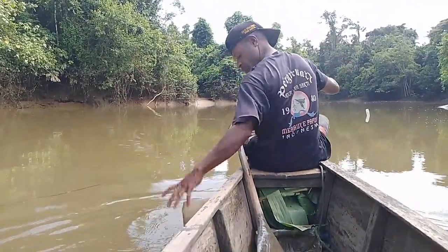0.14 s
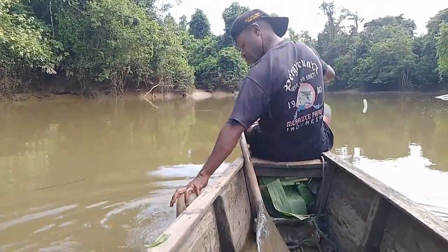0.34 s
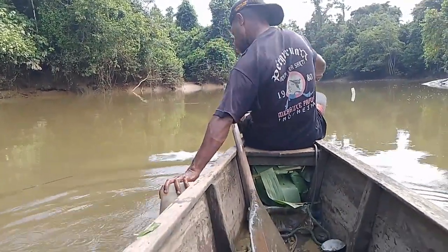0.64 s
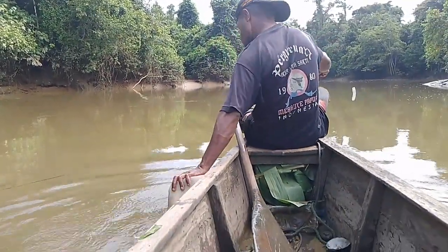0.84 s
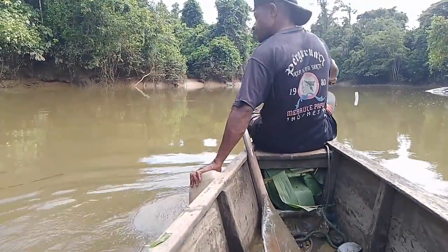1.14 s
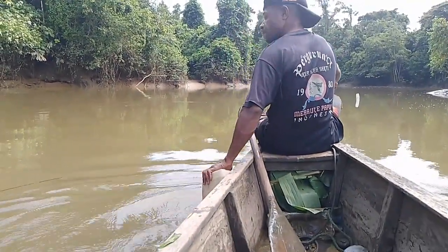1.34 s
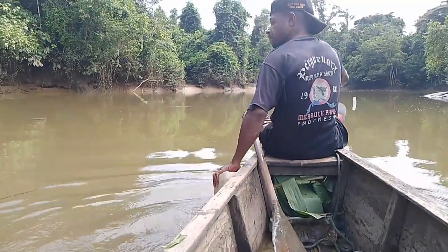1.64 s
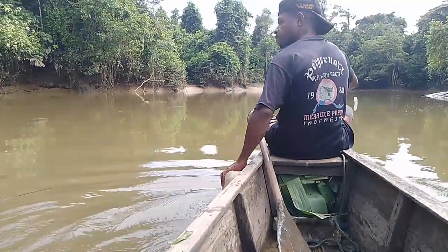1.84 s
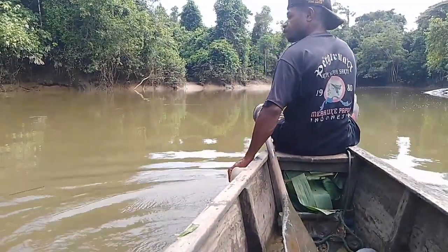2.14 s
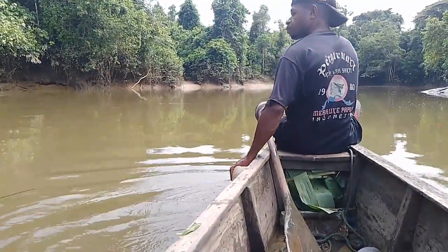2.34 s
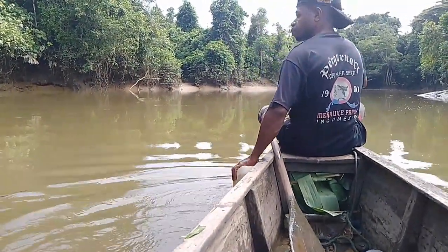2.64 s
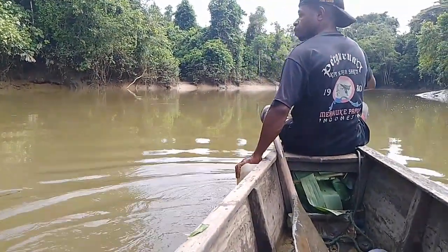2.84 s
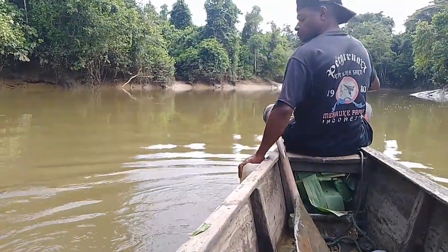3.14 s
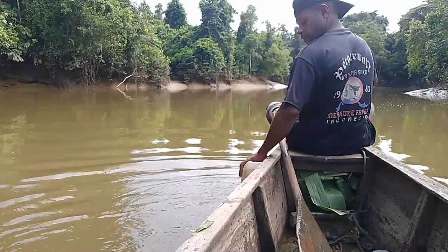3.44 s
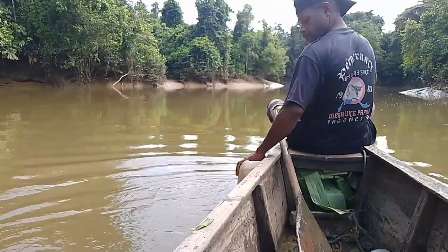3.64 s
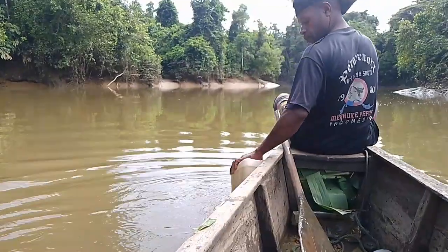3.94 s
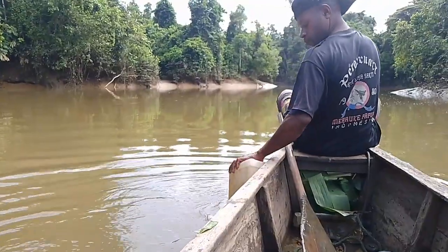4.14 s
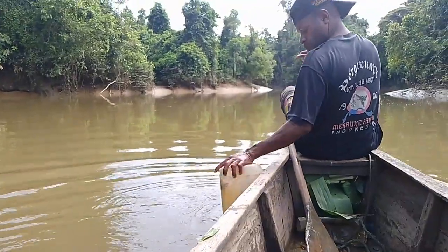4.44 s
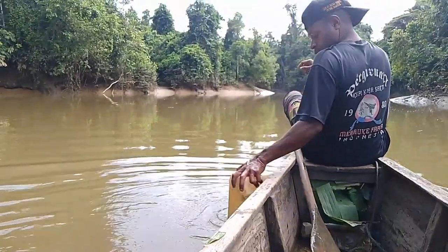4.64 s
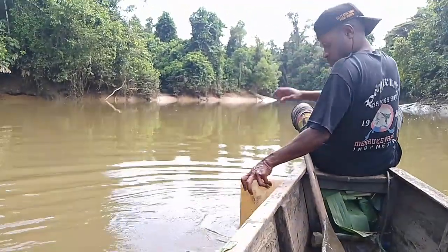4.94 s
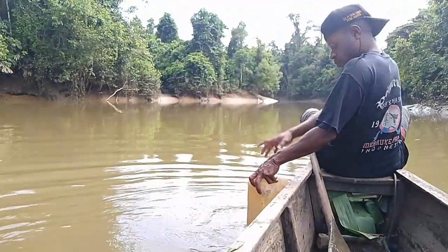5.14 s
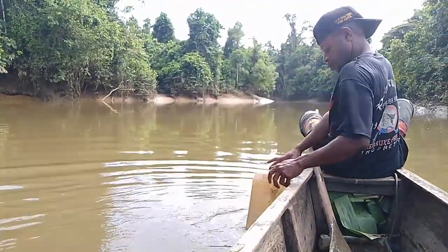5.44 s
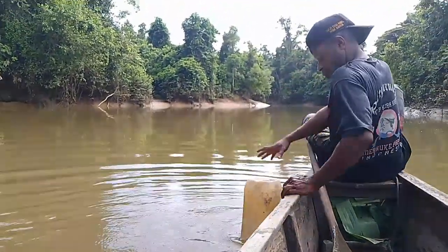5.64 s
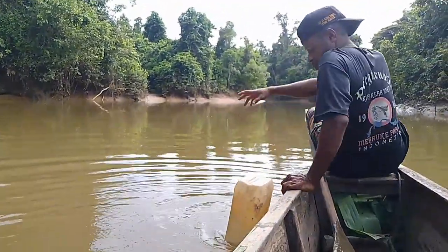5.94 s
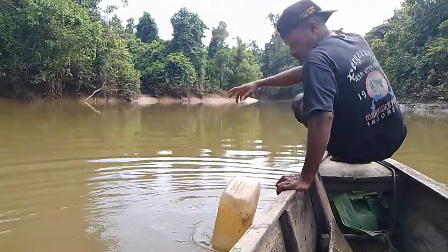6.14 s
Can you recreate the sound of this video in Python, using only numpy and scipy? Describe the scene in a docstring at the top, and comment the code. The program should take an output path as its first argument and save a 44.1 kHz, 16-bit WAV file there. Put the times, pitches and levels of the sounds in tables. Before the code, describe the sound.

Very close to the microphone, a plastic can bumps a wooden canoe in a rapid cluster of low, hollow thuds with grinding, small splashes, gurgles and drips. The water settles and a quiet stretch follows, with only faint hollow notes. Then the can is lifted, rubbing in gritty strokes, knocking the hull and humming hollowly. Faint cicadas pulse over a dull river wash outdoors.

```python
"""A floating plastic can, close to the microphone, knocks and grinds on a wooden canoe, then is lifted and rubbed.
Blows ring the hull's modes with noise cracks; random clicks excite hull and can, and hollow notes and tones hum.
Close round it, water is dying sines for drips, ringing clicks for gurgles and coloured clicks for spray.
In the forest on the banks, cicadas are noise resonating in repeated phrases, over a river and air wash of dull noise."""
import sys
import numpy as np
from scipy import signal
from scipy.fft import rfft, irfft
from scipy.io import wavfile

SR = 44100
rng = np.random.default_rng(int(sys.argv[2]) if len(sys.argv) > 2 else 0)


def store_wav(level_fs):
    """Save 16-bit WAV to argv[1]."""
    pcm = np.round(np.clip(np.atleast_2d(level_fs), -1, 1) * 32767)
    wavfile.write(sys.argv[1], SR, pcm.T.astype(np.int16))


N = 276948   # samples

# Can against plank. Each row: start in s, peak of the ring in dB, pitch where the blow rings most in Hz,
# time to fall 60 dB in s, fall above that pitch in dB per octave.
KNOCKS = [(0.003, -25.5, 252, 0.12, 7.5), (0.102, -31.5, 293, 0.27, -3), (0.112, -25.5, 300.4, 0.16, 2.5),
          (0.122, -23, 286, 0.17, 5), (0.143, -22.5, 226, 0.095, 15), (0.178, -25.5, 151, 0.09, 8),
          (0.227, -22, 173, 0.19, -2.5), (0.249, -23.5, 230, 0.24, 5), (0.278, -20.5, 215, 0.12, 4.5),
          (0.312, -31, 271, 0.18, 0), (0.4, -24.5, 218, 0.12, 34), (0.609, -27.5, 299, 0.11, -2.5),
          (.626, -31.5, 182, .1, -3), (0.648, -28, 164, 0.2, 4), (0.69, -32, 178.6, 0.06, 7),
          (1.031, -39, 197, 0.14, 4), (1.911, -45, 204, 0.099, -3), (1.934, -43, 233, 0.26, 26),
          (2.53, -45.5, 150, 0.27, 2.5), (2.74, -52, 225, 0.29, 11), (3.59, -42.5, 200, 0.17, 3),
          (3.616, -43.5, 185.5, 0.4, 7), (3.828, -31.5, 270.2, 0.19, 8), (3.916, -44, 180, 0.19, 14),
          (4.074, -54, 140, 0.25, -6), (4.169, -33, 234, 0.1, 3), (4.184, -34.5, 267, 0.18, 5.5),
          (4.39, -29, 157, 0.066, 19), (4.423, -31, 174, 0.32, 11), (4.468, -23, 212, 0.19, -0.5),
          (4.477, -27, 423, 0.024, 14), (4.485, -21.5, 409, 0.055, 23), (4.504, -28.5, 207.3, 0.27, 7),
          (4.536, -32, 238, 0.043, 7.5), (4.746, -31, 261, 0.16, 2.5), (4.777, -34.5, 189, 0.11, 5),
          (4.942, -34, 192, 0.087, 2), (4.976, -26.5, 350.5, 0.12, 4), (4.998, -32, 292, 0.095, 7),
          (5.276, -19.5, 310, 0.074, -3), (5.279, -28.5, 188.5, 0.2, 1.5), (5.302, -35, 482, 0.13, 7),
          (5.939, -42.5, 227, 0.34, 2), (5.986, -43, 233.8, 0.39, 0)]
# Modes of the canoe hull. Each row: pitch in Hz, strength in dB.
HULL = [(88, 2.5), (108, 4), (130, -0.5), (162, 3), (194, 1.5), (220, 2.5), (253, 3), (290, 3), (326, -1),
        (377, -8.5), (420, -11.5), (474, -2), (530, -3.5), (603, -3), (668, -5.5), (786, -9.5), (926, -7),
        (1180, -6)]
# Out of the water the can drives the hull less deeply: fall below a blow's pitch, dB per octave.
BASS_FALL_AFLOAT_DB, BASS_FALL_LIFTED_DB = 8, 21
LIFT_S = 4.35   # the can is lifted clear
# Hard plastic edge on wood, a dry crack. Each row: start in s, peak in dB.
CRACKS = [(0.101, -46.5), (0.116, -48), (0.224, -48), (0.611, -42), (4.468, -37.5), (4.479, -54),
          (5.984, -62)]
CRACK_TOP_HZ, CRACK_T60_S = 2780, 0.036
# The can grinding on the planks. Each row: time in s, level in dB.
GRIND = [(0, -41), (.26, -45), (.44, -42.5), (.58, -63), (.72, -48.5), (.9, -58.5), (1.05, -50),
         (1.28, -57), (1.45, -63), (2.33, -73.5), (2.73, -62), (2.85, -72.5), (3.6, -70.5), (3.8, -49),
         (3.93, -56), (4.0, -61.5), (5.3, -58.5), (5.96, -65), (6.28, -65)]
# Modes of the can in the water. Each row: pitch in Hz, width in Hz, strength in dB.
CAN_AFLOAT = [(641, 90, -2), (813, 60, -3), (1500, 130, -2), (1960, 160, -6), (2400, 200, -9),
              (3090, 55, -4)]
# Modes of the can lifted clear. Each row: pitch in Hz, width in Hz, strength in dB.
CAN_LIFTED = [(610, 70, -7), (690, 40, -4), (830, 90, -11), (1030, 60, -11), (1350, 70, -12),
              (1630, 70, -14), (1830, 120, -16), (2280, 150, -16), (2520, 150, -18), (3110, 110, -24),
              (4050, 80, -20), (4950, 100, -27)]
THIN_RING_HZ = 2900   # the can's modes above this ring apart
MODE_WAVER_DB = 2.5   # each mode swells and sinks as the contact moves
FREE_S = 5.27   # the hand lets the can's wall ring freely
# Fine grit of the rubbing. Each row: frequency in Hz, relative level in dB per Hz.
GRIT = [(500, -23), (900, -11), (1500, 7.5), (2300, -3), (2900, -3.5), (3800, -6.5), (5000, -27),]
# Strokes of a wet hand and the plank over the can. Each row: start in s, swell time in s, time it then lasts in s,
# hollow rub in dB, fine grit in dB, thin ring in dB, water running off in dB.
STROKES = [(3.673, 0.21, 0.14, -63.5, -65, -88, -91), (3.846, 0.1, 0.079, -64, -65.5, -75.5, -78),
           (4.068, 0.042, .27, -79, -67, -76, -76), (4.349, 0.14, 0.013, -55.5, -55.5, -73, -67),
           (4.486, 0.23, .16, -53, -60.5, -77, -75), (4.7, 0.086, 0.058, -56.5, -64, -81, -78),
           (4.839, 0.066, 0.043, -51.5, -57.5, -81, -73), (4.936, 0.19, 0.063, -57, -66, -78, -82),
           (5.133, 0.16, 0.195, -55.5, -58.5, -70.5, -71), (5.464, 0.22, 0.092, -57.5, -63.5, -74, -80),
           (5.92, 0.19, .15, -56, -59.5, -77, -77), (6.053, 0.12, 0.046, -54, -56.5, -76, -74),
           (6.117, 0.22, .4, -58, -52.5, -65, -78)]
STROKE_SWELL_DB, EASE_S = 12, 0.25   # swell up to the strongest moment; time to ease by as much
LET_GO_S, RESTING_DB = 0.02, -15.5   # fade at either end; resting contact relative to the mean stroke
# Air humming in the lifted can, its pitch moving as the can tilts. Each row: time in s, pitch in Hz, level in dB.
CAN_HUM = [(4.5, 299, -59), (4.9, 314, -59.5), (5.17, 300, -52.5), (5.23, 275, -53.5), (5.3, 307.7, -50),
           (5.47, 305.4, -54.5), (5.55, 322, -63), (5.66, 369.7, -54.5), (5.75, 300, -69),
           (5.95, 278.4, -67), (6.15, 312, -52.5)]
# Blurred hollow can notes that swell and fade. Each row: middle in s, half length in s, level in dB, pitch in Hz.
SWELLS = [(2.397, 0.02, -67, 1307), (2.456, 0.015, -67, 1340), (2.487, 0.041, -69.5, 1110),
          (2.547, 0.028, -62.5, 1006), (2.635, 0.044, -71, 1364), (2.674, 0.045, -68, 1014),
          (3.02, 0.098, -73, 486), (3.231, 0.059, -70, 470), (4.921, 0.02, -43.5, 656),
          (4.869, 0.017, -52, 610), (5.436, 0.042, -53, 600), (6.156, 0.1, -59.5, 687)]
# Splashes round the can. Each row: start in s, length in s, small bubbles in dB, spray in dB.
SPLASHES = [(0, 0.026, -70, -60), (0.091, 0.041, -52.5, -53), (0.226, 0.1, -51, -52),
            (0.375, 0.023, -63, -53.5), (0.443, 0.027, -63.5, -59.5), (0.607, 0.034, -58, -56),
            (0.617, 0.054, -61, -57), (1.169, 0.17, -57, -62)]
SPLASH_RISE_S, SPLASH_FALL_DB_PER_S = 0.011, 295
# Lapping between splashes, until the water settles.
LAP_BUBBLES_DB, LAP_SPRAY_DB, SETTLES_S, SETTLE_DB_PER_S = -64, -64, 1.48, 36
# Colour of the spray. Each row: frequency in Hz, relative level in dB per Hz.
SPRAY = [(300, -10.5), (600, 7), (1100, 4.5), (2000, 1), (3200, -11), (5000, -22.5), (8000, -40)]
# Bubbles and drips. Each row: start in s, level before fading and tick in dB, starting pitch in Hz,
# cycles at that pitch in a 60 dB fall.
DRIPS = [(0.207, -52.5, 4300, 86), (.267, -57, 3420, 46), (.28, -36, 1876, 96), (0.32, -31.5, 2620, 9.7),
         (0.319, -44.5, 5530, 75), (0.439, -41, 1410, 34), (.445, -46, 1045, 60), (.49, -37, 1180, 20),
         (.548, -43, 620, 42), (.635, -40.5, 1070, 42), (.751, -40, 2690, 51), (.752, -44, 3380, 40),
         (0.833, -51, 1337, 130), (1.05, -46.5, 490, 54), (1.073, -53, 3880, 88), (1.103, -46, 707, 48),
         (1.139, -39, 2240, 41), (1.145, -47.5, 620, 94), (1.189, -43, 1530, 50), (1.188, -50, 1246, 140),
         (1.203, -40, 1560, 60), (1.219, -42.5, 468, 45), (1.225, -44, 1720, 74), (1.239, -46.5, 1150, 86),
         (1.345, -42, 4880, 65), (1.367, -45, 615, 18), (1.375, -51.5, 2320, 76), (1.409, -43, 778, 57),
         (1.409, -47, 1045, 92), (1.415, -46, 483, 21), (1.419, -42.5, 2180, 56), (1.44, -52, 1290, 78),
         (1.51, -54, 584, 62), (1.515, -54, 2400, 50), (1.545, -55, 583, 38), (1.59, -55.5, 624, 49),
         (1.63, -51.5, 1640, 65), (2.2, -55.5, 2410, 72)]
# Cicada choirs, low to high. Each row: level in dB, start of a phrase in s, repeat period in s, phrase length in s,
# drop between phrases in dB, edge in s.
CHOIRS = [(-75.5, 1.3, 1.66, 0.95, 4, 0.14), (-75, 0.78, 1.8, 0.71, 5, 0.18),
          (-66.5, 0.87, 1.546, 0.68, 4, 0.73), (-77.5, 1.5, 1.94, 1.24, 7, .1)]
# The tymbal resonance of each choir. Each row: pitch in Hz, width in Hz.
TYMBALS = [(6560, 200), (6880, 160), (7755, 130), (9230, 110)]
THROBS_PER_S, THROB_DEPTH = 92, .3
# Colour of river, leaves and air. Each row: frequency in Hz, relative level in dB per Hz.
WASH = [(40, 5), (60, 8), (100, -2.5), (200, -19), (400, -10), (800, -17), (1350, -13.5), (2000, -19.5),
        (3200, -25.5), (5000, -31.5), (6500, -73.5), (8500, -32), (10000, -18.5), (12000, -28)]
WASH_DB = -61
CUTOFF_HZ, HISS_TOP_HZ, OFFSET = 10900, 15800, .0217   # stopband edges; constant offset of full scale


def from_db(db):
    """Amplitude ratio of a level in dB."""
    return 10 ** (np.asarray(db) / 20)


def rms_one(x):
    """Scales a signal to rms 1."""
    return x / np.sqrt(np.mean(x ** 2) + 1e-20)


def in_time(rows):
    """Columns of a curve table at every sample."""
    s, *columns = np.transpose(rows)
    return [np.interp(np.arange(N) / SR, s, c) for c in columns]


def drift(rate_hz):
    """Slow random wander of spread 1, drawn every 40 samples and joined by lines."""
    r = np.exp(-80 * np.pi * rate_hz / SR)
    noise = rng.standard_normal(N // 40 + 2002)
    slow = signal.lfilter([1], [1, -2 * r, r * r], noise)[2000:]
    return np.interp(np.arange(N) / 40, np.arange(len(slow)), rms_one(slow))


def colour(x, spectrum):
    """Filters x by a table's curve, drawn over log frequency, to rms 1."""
    hz, db = np.transpose(spectrum)
    bins = np.fft.rfftfreq(N, 1 / SR) + 1
    gain = from_db(np.interp(np.log(bins), np.log(hz), db))
    return rms_one(irfft(rfft(x) * gain, N))


def bandpass(x, order, low_hz, high_hz):
    """Butterworth band between two frequencies."""
    return signal.sosfilt(signal.butter(order, [low_hz, high_hz], "band", fs=SR, output="sos"), x)


def resonate(x, hz, width_hz):
    """Two-pole resonance, gain about 1 on top."""
    r = np.exp(-np.pi * abs(width_hz) / SR)
    zeros = np.array([1, 0, -1]) * (1 - r * r) / 2
    poles = [1, -2 * r * np.cos(2 * np.pi * hz / SR), r * r]
    return signal.lfilter(zeros, poles, x + 1e-18)


def grains(per_s, spread_db):
    """Random clicks of uneven size and sign."""
    sizes = from_db(spread_db * np.minimum(rng.exponential(1, N), 4)) * rng.choice([-1, 1], N)
    return sizes * (rng.random(N) < per_s / SR)


def add(out, s, sound):
    """Mixes a short sound in at time s."""
    i = max(round(s * SR), 0)
    out[i:i + len(sound)] += sound[:N - i]


def decay(t, t60):
    """Exponential fall of 60 dB in t60 seconds, at least 5 ms."""
    return from_db(-60 * t / max(t60, .005))


def knocks():
    """Each blow rings the hull modes near its own pitch most and adds a faint crack, stronger in bright blows."""
    out, t = np.zeros(N), np.arange(SR // 2) / SR
    hz, mode_db = np.transpose(HULL)
    share = np.minimum(1, (330 / hz) ** 0.54)     # high modes die sooner
    scatter = rng.standard_normal((len(KNOCKS), 3, len(HULL)))
    noises = rng.standard_normal((len(KNOCKS), len(t)))
    for (s, peak_db, centre_hz, t60, fall_db), chance, noise in zip(KNOCKS, scatter, noises):
        octaves = np.log2(hz / centre_hz)
        bass_fall_db = BASS_FALL_AFLOAT_DB if s < LIFT_S else BASS_FALL_LIFTED_DB
        tilt_db = -np.where(octaves > 0, fall_db, -bass_fall_db) * octaves
        strength = from_db(mode_db + tilt_db + 1.5 * chance[0])
        # the hand and the water load the plank differently each time
        detuned = hz * (1 + 0.0396 * chance[1])
        # the struck plank itself rings out, on the blow's pitch
        struck = np.argmin(np.abs(octaves))
        detuned[struck], strength[struck] = centre_hz, 2.4
        # the bending waves reach the radiating planks at different times, in s
        late = .0012 * np.abs(chance[2])
        late[struck] = 0
        ring = np.zeros(len(t))
        for a, f, k, wait in zip(strength, detuned, share, late):
            age = np.maximum(t - wait, 0)
            ring += a * decay(age, t60 * k) * np.sin(2 * np.pi * f * age)
        # a small patch of plank radiates little below its pitch, and the wet contact is soft
        ring = -bandpass(ring, 2, 0.39 * centre_hz, 1300)
        crack = bandpass(noise * decay(t, 0.025), 3, 700, 2600)
        crack_gain = from_db(-50.0 - 1.1 * fall_db)
        blow = ring / np.max(np.abs(ring)) + crack_gain * crack / np.max(np.abs(crack))
        add(out, s, from_db(peak_db) * blow)
    return out


def cracks():
    """The hard edge on wood is a band of noise that dies fast."""
    out, t = np.zeros(N), np.arange(SR // 10) / SR
    noises = rng.standard_normal((len(CRACKS), len(t)))
    for (s, peak_db), noise in zip(CRACKS, noises):
        crack = bandpass(noise * decay(t, CRACK_T60_S), 3, 1000, CRACK_TOP_HZ)
        add(out, s, from_db(peak_db) * crack / np.max(np.abs(crack)))
    return out


def drag():
    """Slips of the can excite the low hull modes; sliding skin and wood excite the hollow can and a fine grit."""
    slips = grains(160 * from_db(3.6 * drift(15)), 2.5)
    grind = np.zeros(N)
    for k, (hz, db) in enumerate(HULL):
        if hz < 450:
            grind += from_db(db) * resonate(slips, hz, 21.0) * (-1) ** k   # neighbouring modes alternate in sign
    roughness = from_db(1.5 * drift(40))
    scuffs, sand = grains(2500 * roughness, 0.84), grains(2500 * roughness, 1.0)
    hollow = rubbed_can(scuffs, 0, 1200, LIFT_S)
    middle = rubbed_can(scuffs, 1200, THIN_RING_HZ, LIFT_S)
    thin = rubbed_can(scuffs, THIN_RING_HZ, SR, FREE_S)
    grit = rms_one(middle + .7 * colour(sand, GRIT))
    runoff = rms_one(bandpass(grains(6000, 1.7), 2, 3000, 7500))
    rubbing = np.sum(strokes() * [hollow, grit, thin, runoff], axis=0)
    return from_db(in_time(GRIND)[0]) * rms_one(grind) + rubbing


def rubbed_can(scuffs, low_hz, high_hz, change_s):
    """The can's modes in a band ring under the scuffs, the afloat set before change_s and the lifted set after."""
    states = []
    for modes in (CAN_AFLOAT, CAN_LIFTED):
        ring = np.zeros(N)
        for k, (hz, width_hz, db) in enumerate(modes):
            if low_hz < hz <= high_hz:
                gain = from_db(db + MODE_WAVER_DB * drift(5.2))
                ring += gain * resonate(scuffs, hz, width_hz) * (-1) ** k
        states.append(rms_one(ring))
    afloat, lifted = states
    return np.where(np.arange(N) / SR < change_s, afloat, lifted)


def strokes():
    """Gains of rub, grit, ring and run-off: each stroke swells to its strongest moment, eases and lets go."""
    t = np.arange(N) / SR
    resting = from_db(np.mean(STROKES, axis=0)[3:] + RESTING_DB)[:, None]
    gains = resting * np.clip((t - STROKES[0][0]) / LET_GO_S, 0, 1)
    for start, swells_s, lasts_s, *levels_db in STROKES:
        top, end = start + swells_s, start + swells_s + lasts_s
        swell_db = np.interp(t, [start, top, top + EASE_S], [-STROKE_SWELL_DB, 0, -STROKE_SWELL_DB])
        shape = from_db(swell_db) * np.clip(np.minimum(t - start, end - t) / LET_GO_S, 0, 1)
        gains = np.maximum(gains, from_db(levels_db)[:, None] * shape)
    return gains


def can_hum():
    """The air in the lifted can hums: an unsteady tone, wandering in amplitude and phase, follows its pitch."""
    hz, db = in_time(CAN_HUM)
    phase = 2 * np.pi * np.cumsum(hz) / SR
    hum = (0.44 + drift(21.0)) * np.sin(phase) + drift(34.0) * np.cos(phase)
    return from_db(db) * rms_one(hum) * (np.arange(N) / SR > LIFT_S)


def swells():
    """Blurred hollow can notes: noise in a narrow resonance under a bell-shaped envelope."""
    out, t = np.zeros(N), np.linspace(-.2, .2, SR * 2 // 5)
    noises = rng.standard_normal((len(SWELLS), len(t)))
    for (s, half, level_db, hz), noise in zip(SWELLS, noises):
        note = rms_one(resonate(resonate(noise, hz, 110.0), hz, 110.0))
        add(out, s + t[0], from_db(level_db) * np.exp(-(t / half) ** 2) * note)
    return out


def stirred_water():
    """Small bubbles ring at random, the high ones weaker; spray crackles over them."""
    t = np.arange(N) / SR
    fizz = np.zeros(N)
    for hz in np.geomspace(450, 4300, 26):
        bubbles = resonate(grains(16.0, 4.8), hz, hz / 17.0)
        fizz += from_db(-6.5 * np.log2(hz / 1000)) * rms_one(bubbles)
    spray = colour(grains(1100 * from_db(5.0 * drift(35)), 3.6), SPRAY)
    settling = from_db(-SETTLE_DB_PER_S * np.maximum(t - SETTLES_S, 0))
    gains = from_db([[LAP_BUBBLES_DB], [LAP_SPRAY_DB]]) * settling
    for s, length, *levels_db in SPLASHES:
        rise = np.clip((t - s) / SPLASH_RISE_S, 0, 1)
        fall = from_db(-SPLASH_FALL_DB_PER_S * np.maximum(t - s - length, 0))
        gains = np.maximum(gains, from_db(levels_db)[:, None] * rise * fall)
    return gains[0] * rms_one(fizz) + gains[1] * spray


def drips():
    """A drop lands with a tick; its bubble is a dying sine that rises as it nears the surface."""
    out, t = np.zeros(N), np.arange(SR // 5) / SR
    noises = rng.standard_normal((len(DRIPS), len(t)))
    for (s, level_db, hz, cycles), noise in zip(DRIPS, noises):
        t60 = cycles / hz
        rising = np.sin(2 * np.pi * hz * (t + 0.058 * t ** 2 / t60))
        bubble = (1 - np.exp(-t / 0.001)) * decay(t, t60) * rising
        tick = bandpass(noise * decay(t, .7 * t60), 2, .76 * hz, 1.28 * hz)
        add(out, s, from_db(level_db) * (bubble + .4 * tick / np.max(np.abs(tick))))
    return out


def cicadas():
    """Many click trains blur into noise ringing in each tymbal, with a faint throb at a shared rate."""
    out, t = np.zeros(N), np.arange(N) / SR
    for choir, (hz, width_hz) in zip(CHOIRS, TYMBALS):
        throb = 1 + THROB_DEPTH * np.sin(2 * np.pi * THROBS_PER_S * t + 5.1 * drift(3.3))
        noise = rng.standard_normal(N) * throb * from_db(0.27 * drift(6.6))
        skirt = resonate(resonate(noise, hz, 4.0 * width_hz), hz, 4.0 * width_hz)
        song = resonate(noise, hz, width_hz) + .5 * skirt
        out += from_db(phrases(*choir)) * rms_one(song)
    return out


def phrases(level_db, start, period, length, drop_db, edge):
    """Level in dB of a choir that sings, sinks between phrases and sings again."""
    # time from the middle of the nearest phrase
    age = (np.arange(N) / SR - start - length / 2 + period / 2) % period - period / 2
    return level_db - drop_db * np.clip(.5 + (np.abs(age) - length / 2) / edge, 0, 1)


def wash():
    """River, leaves and air: steady dull noise that wavers a little."""
    return from_db(WASH_DB + 1.3 * drift(1.6)) * colour(rng.standard_normal(N), WASH)


def scene():
    """Can and canoe close by, water round them, cicadas and river behind, in one channel."""
    can = knocks() + cracks() + drag() + can_hum() + swells()
    water = stirred_water() + drips()
    return (can + water + cicadas() + wash())[None]


def record(dry):
    """The top rolls off and is cut above a faint converter hiss; the signal sits on a constant offset."""
    cut = signal.sosfilt(signal.cheby2(8, 40, CUTOFF_HZ, fs=SR, output="sos"), dry)
    hiss_filter = signal.cheby2(10, 30, HISS_TOP_HZ, fs=SR, output="sos")
    hiss = signal.sosfilt(hiss_filter, rng.standard_normal(dry.shape))
    return cut + from_db(-98) * hiss + OFFSET


dry = scene()
out = record(dry)
store_wav(out)
```